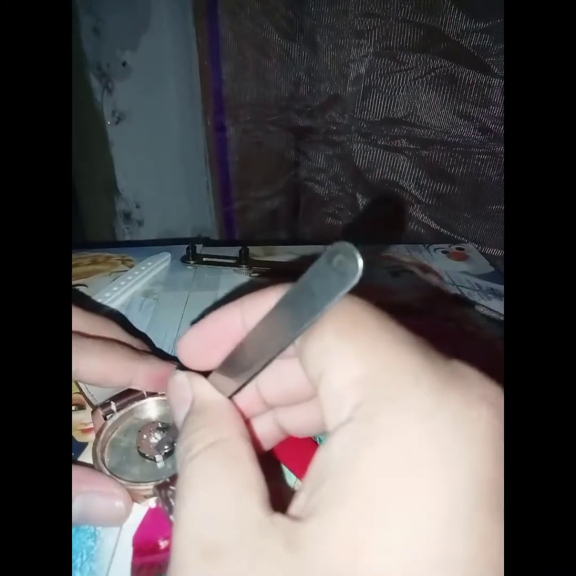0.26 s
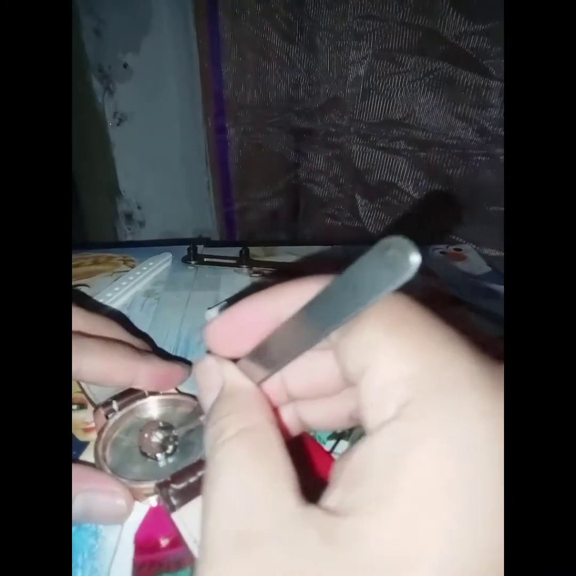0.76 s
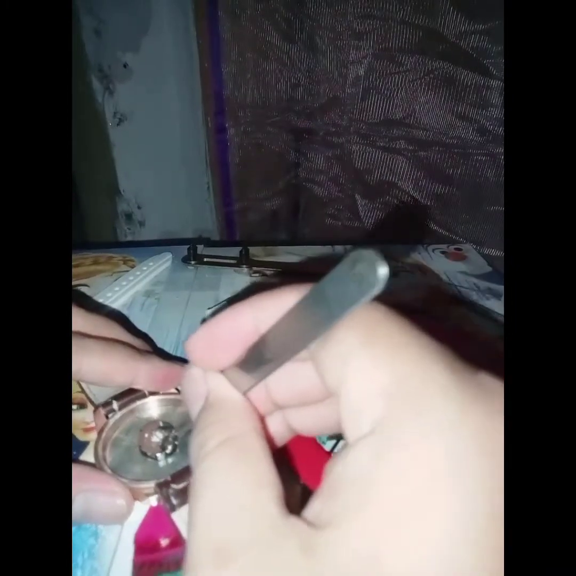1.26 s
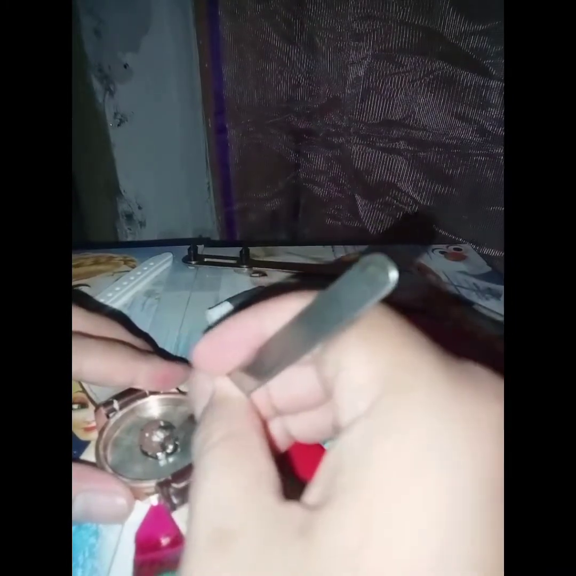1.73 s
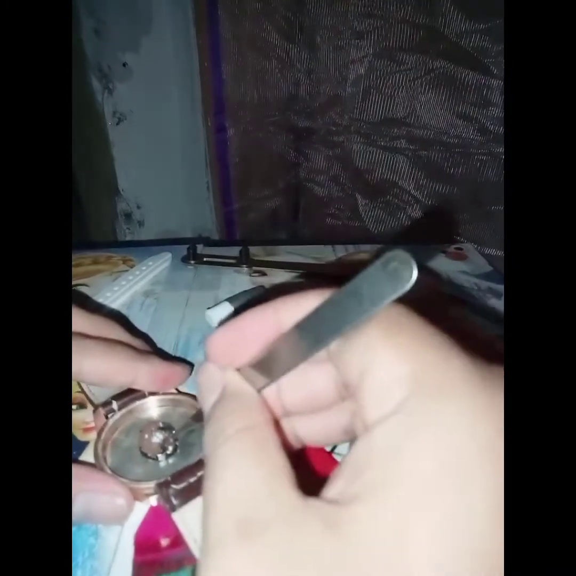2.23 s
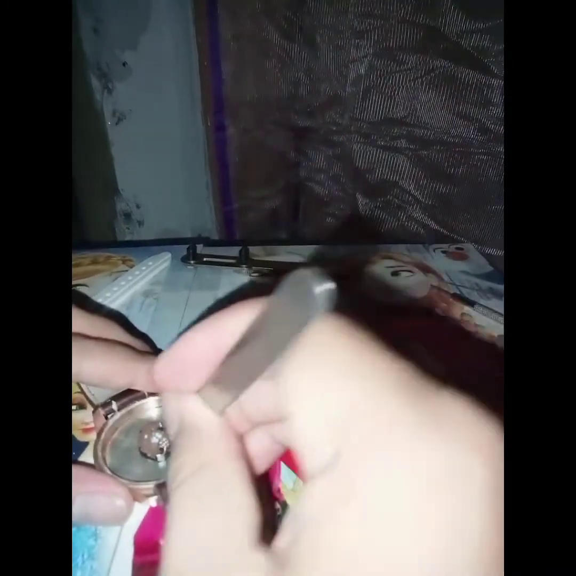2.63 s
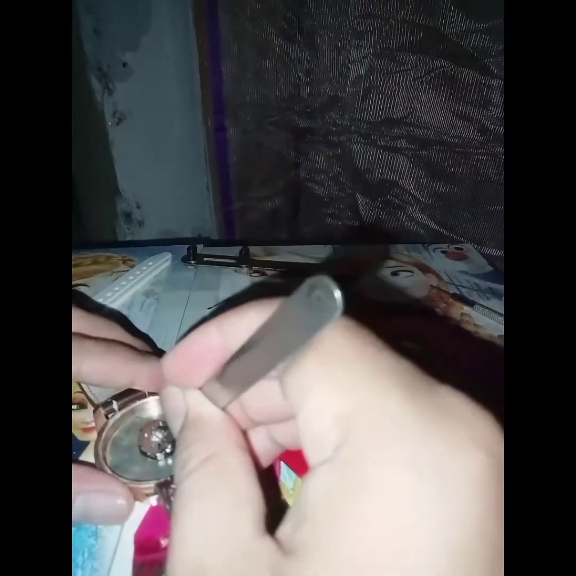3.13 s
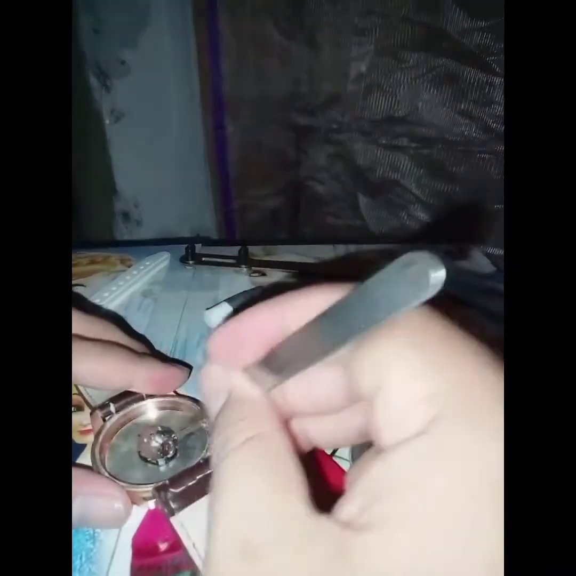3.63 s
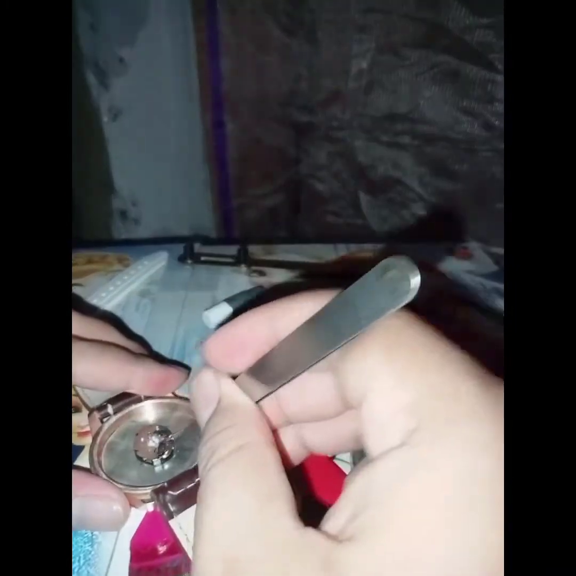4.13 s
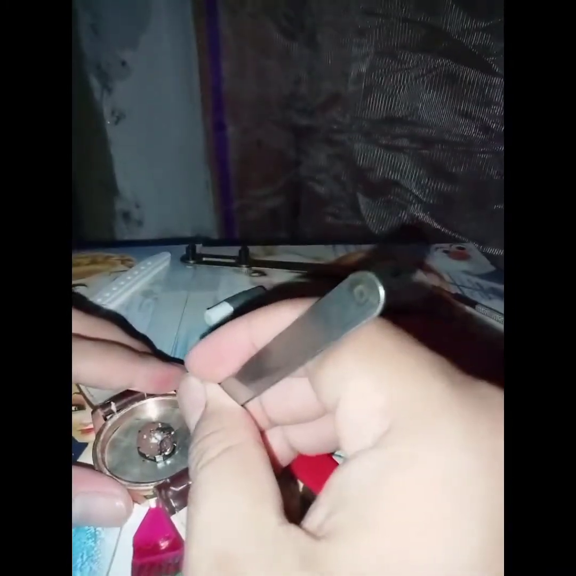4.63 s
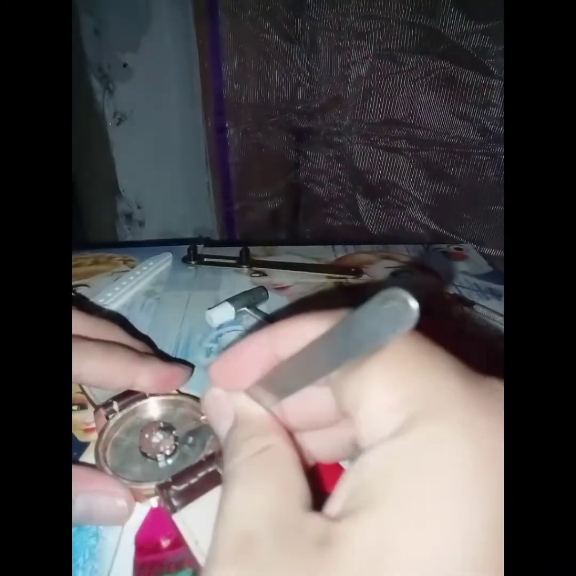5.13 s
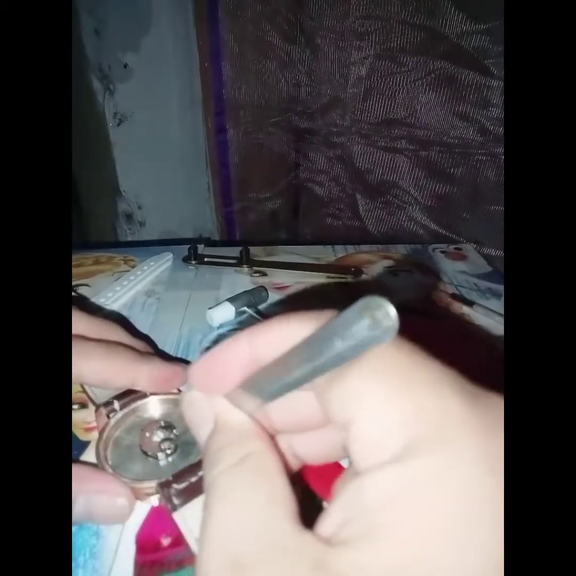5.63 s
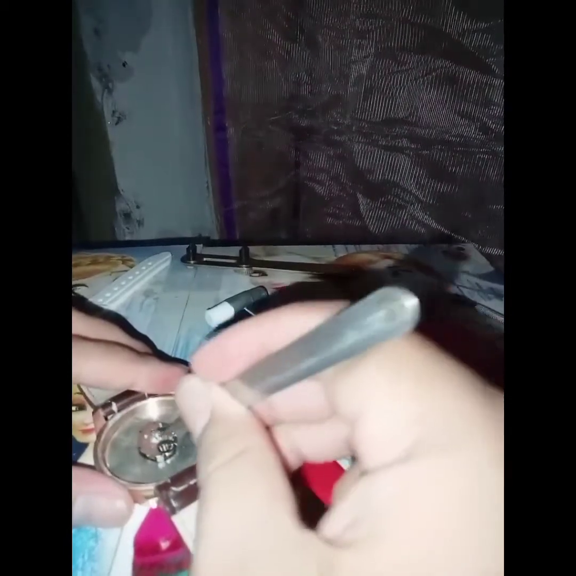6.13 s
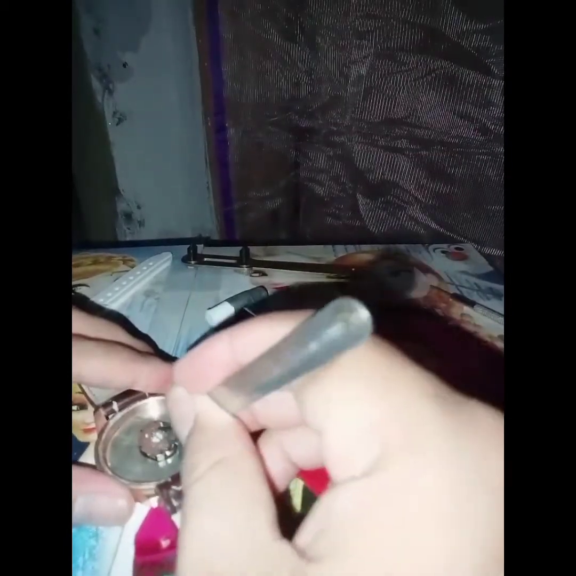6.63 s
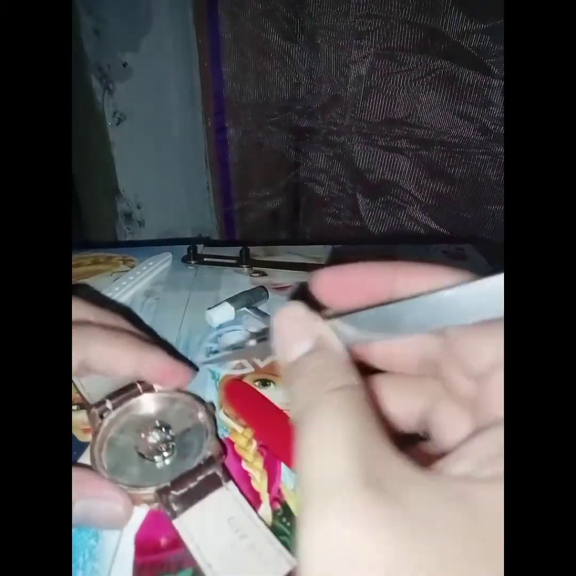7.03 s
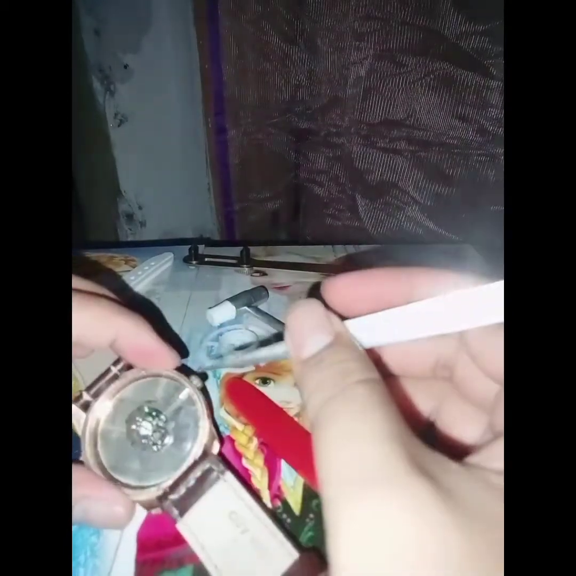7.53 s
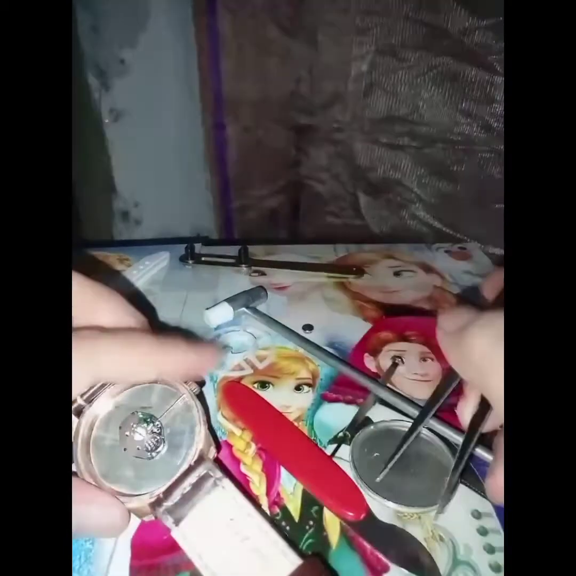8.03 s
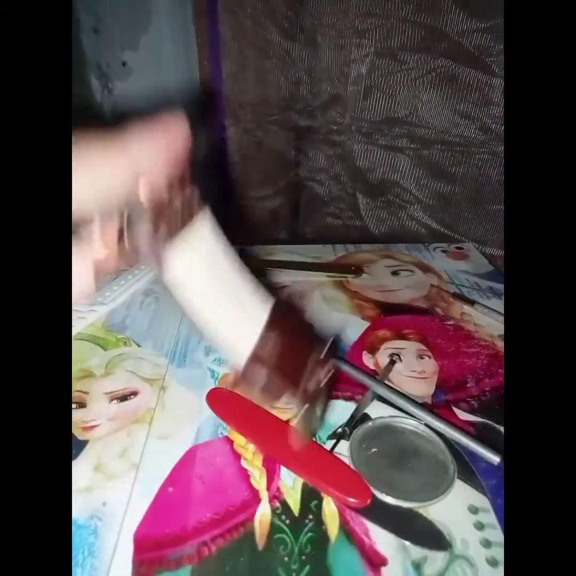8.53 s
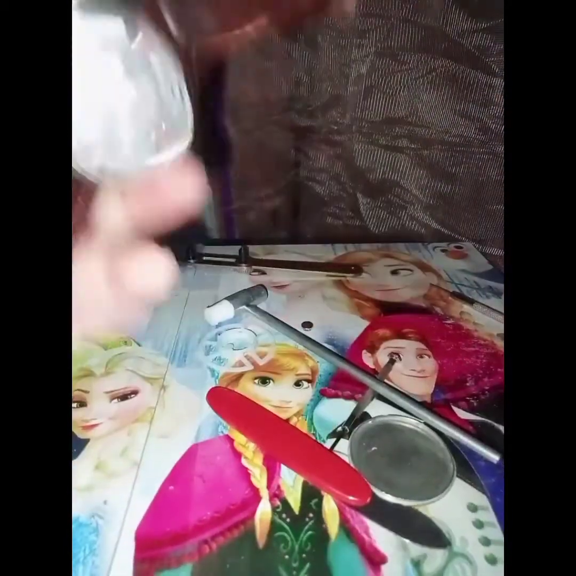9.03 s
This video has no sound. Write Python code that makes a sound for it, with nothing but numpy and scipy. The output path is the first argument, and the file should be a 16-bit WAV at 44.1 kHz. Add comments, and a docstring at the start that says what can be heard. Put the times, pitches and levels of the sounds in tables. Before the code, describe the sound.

Steel tweezers tick and slip lightly on a small battery inside an open wristwatch, in scattered little clusters. About halfway through, the battery snaps into place with a loud, sharp double click. A few faint ticks follow, then the watch squeaks very faintly under the fingers and is dragged off the table with a short rasp, buckle clinks and soft strap knocks. The microphone is close, in a small quiet room.

```python
"""Tweezers seating a watch battery

Steel tweezers tick and slip on a button cell in an open wristwatch on a table, close by in a small room;
each contact excites damped modes. The cell snaps home with a loud double click that drives the limiter.
The watch then squeaks faintly under the fingers and is dragged off the table with stick-slip friction,
its buckle jingling and its strap knocking on the top."""
import sys
import numpy as np
from scipy import signal
from scipy.fft import rfft, irfft, next_fast_len
from scipy.io import wavfile
from scipy.ndimage import uniform_filter1d, minimum_filter1d

SR = 44100
rng = np.random.default_rng(int(sys.argv[2]) if len(sys.argv) > 2 else 0)


def master(y):
    """Save y as 16-bit WAV."""
    cut = np.clip(np.atleast_2d(y).T, -1, 1)
    pcm = np.round(cut * 32767)  # scale
    wavfile.write(sys.argv[1], SR, pcm.astype(np.int16))


N = 408347


def from_db(db):
    """Amplitude ratio of a level in decibels."""
    return 10 ** (np.asarray(db) / 20)


def to_db(gain):
    """Level in decibels of an amplitude ratio."""
    return 20 * np.log10(gain + 1e-7)


def unit_rms(x):
    """Normalisation to unit mean power."""
    return x / np.sqrt(np.mean(x ** 2) + 1e-20)


def at_hz(rows, hz, column=1):
    """Interpolation of a table on a logarithmic frequency axis."""
    rows = np.array(rows)
    return np.interp(np.log(hz + 1), np.log(rows[:, 0]), rows[:, column])


def coloured(x, spectrum):
    """Spectral shaping: multiplication in the frequency domain, returned at unit rms."""
    size = next_fast_len(N)
    gain = from_db(at_hz(spectrum, np.fft.rfftfreq(size, 1 / SR)))
    return unit_rms(irfft(rfft(x, size) * gain, size)[:N])


def resonate(x, hz, width_hz):
    """Damped oscillator: a two-pole resonance whose bandwidth sets its decay rate."""
    r = np.exp(-np.pi * width_hz / SR)
    return signal.lfilter([1, 0, -1], [1, -2 * r * np.cos(2 * np.pi * hz / SR), r * r], x)


# room air, lower once the cell has snapped home: t/s, relative level/dB
AIR_BEFORE_SNAP = [(0.0, -59), (4.05, -53), (4.35, -56), (5.1, -57)]
AIR_AFTER_SNAP = [(5.5, -61), (5.8, -59), (7.53, -60), (8.35, -56)]
# spectrum of the dull background noise: f/Hz, relative density/dB
AIR_SPECTRUM = [(55, -12.5), (90, 0), (170, -5.5), (295, 2), (400, -9.5), (560, -14.5), (850, -6),
                (1400, -13), (1850, -17.5), (2600, -18), (4500, -23), (5600, -33.5), (10000, -39)]
# microphone hiss: f/Hz, bandwidth/Hz, level/dB at the median air level
HISS_BANDS = [(7130, 470, -74), (7800, 310, -82)]
def background(air_db=.5, hiss_follow=0.73):
    """Filtered noise: dull room air and narrow-band microphone hiss swell and sink together."""
    level_db = np.interp(np.arange(N) / SR, *np.transpose(AIR_BEFORE_SNAP + AIR_AFTER_SNAP))
    air = from_db(level_db + air_db) * coloured(rng.standard_normal(N), AIR_SPECTRUM)
    hiss = 0
    for hz, width, db in HISS_BANDS:
        band = resonate(rng.standard_normal(N), hz, width)
        hiss += from_db(db) * unit_rms(resonate(band, hz, 2 * width))
    return air + hiss * from_db(hiss_follow * (level_db - np.median(level_db)))


def slip_force(t, slip_ms, grit=.45, catches=4):
    """Stick-slip: a tip catches a few times and skids over fine grit in between."""
    slip_s = slip_ms * 1e-3
    force = grit * rng.standard_normal(len(t)) / (1 + (t / slip_s) ** 3)
    caught_at = ((np.arange(catches) + rng.random(catches)) / catches * slip_s * SR).astype(int)
    force[caught_at] += rng.choice([-1, 1], catches) * (1 + rng.random(catches))
    pressure = 1 - np.exp(-t / (.25 * slip_s))
    return force * pressure


# modes of case, table, movement, tweezers and small parts: f/Hz, bandwidth/Hz, relative level/dB
PART_MODES = { "case": [(2744, 160, 0.5), (3393, 170, 2), (3750, 540, 0), (4630, 190, -3.5)],
              "table": [(260, 150, -6), (403, 100, -1)], "movement": [(850, 120, -3), (1100, 190, 0),
              (1361, 270, -1.5), (1780, 190, -5.5)], "tweezers": [(6470, 340, 0.5), (7550, 140, 0),
              (7800, 230, -3.5), (9000, 490, -10.5)], "small parts": [(10700, 1200, -6), (13000, 300, -8.5),
              (14100, 940, -0.5), (15400, 190, 2)], }
def ring_parts(force, shares_db, crack_db, widen, detune, scatter_db):
    """Modal superposition: one force rings every part, and the changing grip detunes the modes."""
    sound = from_db(crack_db) * unit_rms(force)
    for modes, share_db in zip(PART_MODES.values(), shares_db):
        part = 0
        for k, (hz, width, db) in enumerate(modes):
            ring = resonate(force, hz * (1 + detune * rng.uniform(-1, 1)), width * widen)
            part += (-1) ** k * from_db(db + scatter_db * rng.standard_normal()) * unit_rms(ring)
        sound += from_db(share_db) * unit_rms(part)
    return sound


def impact(t, level_db, slip_ms, weight_db, hardness_db, spot_hz):
    """Impact radiation: the direct click, and the smoother sum of all directions that feeds the room."""
    movement_db = 1.5 + .24 * weight_db
    tweezers_db = -.5 + .35 * hardness_db
    shares_db = [0, weight_db, movement_db, tweezers_db, hardness_db]   # relative to the case
    force = slip_force(t, slip_ms)
    click = ring_parts(force, shares_db, crack_db=-10.5, widen=0.73, detune=.03, scatter_db=1.0)
    struck_spot = unit_rms(resonate(force, spot_hz, width_hz=260))
    click += from_db(-6) * np.std(click) * struck_spot
    impulse = 1.0 * (t == 0)
    spread = ring_parts(impulse, shares_db, crack_db=-5.0, widen=1.15, detune=.019, scatter_db=2.0)
    dryness = from_db(0.6 * min(level_db + 46, 0))   # light ticks sound drier, with less room tail
    gain = from_db(level_db - 2.5) * np.sqrt(.01 / t[-1])   # energy referred to 10 ms
    return gain * click, gain * dryness * spread


# metal contacts; weight rings the table and movement, hardness the small parts and tweezers:
# t/s, relative case level/dB, slip time/ms, weight/dB, hardness/dB, f/Hz of the struck spot
TOUCHES = [(0.4966, -41, 6.2, -12, -3, 3200), (0.5089, -35.5, 6, -22, -11, 6800),
           (0.529, -43.5, 3.5, -7, -7, 3400), (0.5617, -48.5, 1.54, -5, -3, 6460),
           (1.1244, -51.5, 3.3, -5.5, -5, 830), (1.5357, -48.5, 2.2, -7, -7, 3620),
           (1.852, -28, 3.2, -2, -12, 2840), (2.6403, -30, 7.2, -1, -11, 7500),
           (2.661, -38.5, 1.9, 4, -11, 3410), (2.685, -33, 5.6, -8, -6, 15300),
           (2.733, -42.5, 2.9, -3, -1, 6600), (2.816, -42, 4.3, -7, -3, 6170),
           (3.154, -48.5, 6.1, -4, -13, 6600), (3.343, -34.5, 4.7, -2, -9, 1070),
           (3.349, -29.5, 3.55, -3, -10, 4430), (3.568, -42, 4.6, -9, -7, 3450),
           (3.931, -45.5, 2.8, -26, -4, 3360), (3.951, -46.5, 8.3, -17, -21, 3360),
           (5.151, -8.5, 4.3, 1.5, -4, 4560), (5.185, -3, 4.3, 0, 1, 3700),
           (5.7492, -40, 2.45, -4, -12, 2710), (5.7795, -47, 2.9, -28, -18, 2690),
           (6.348, -47, 1.23, -5, -3, 7350), (6.623, -54, 5.5, -8, -2, 1100),
           (6.7479, -50.5, 1.2, 0, 3, 7400), (6.9817, -50, 5.1, -4, -14, 2800),
           (8.2487, -46.5, 3.5, -7, -25, 1420), (8.4327, -43.5, 2.8, -26, 10, 13770),
           (8.448, -40, 3.9, 2, 6, 7160), (8.4911, -32.5, 2.5, 1, 11, 15500),
           (8.639, -48, 2.8, -12, 0.5, 6700), (8.827, -46.5, 8.1, -13, -25, 2280)]
# light, hard grazes of the tips: t/s, nominal peak level/dB
GRAZES = [(1.1513, -39), (2.0238, -47), (2.8594, -46), (4.0183, -40), (4.0534, -38), (4.1849, -43.5),
          (4.5082, -43.5), (4.9025, -49.5), (7.8331, -45)]
# heavy, soft bumps of the watch on the table: t/s, relative case level/dB
BUMPS = [(2.692, -44.5), (8.497, -39), (8.537, -48)]
def contacts(graze_crest_db=18):
    """Linear superposition: all impacts add into a direct sound and a feed to the room."""
    # both are filled out to the columns of TOUCHES
    grazes = [(s, db - graze_crest_db, 4, -12, -3, 7200) for s, db in GRAZES]
    bumps = [(s, db, 2.6, 11, -11, 890) for s, db in BUMPS]
    t = np.arange(int(.05 * SR)) / SR
    direct, room_feed = np.zeros((2, N + len(t)))
    for start, *blow in TOUCHES + bumps + grazes:
        click, spread = impact(t, *blow)
        span = slice(int(start * SR), int(start * SR) + len(t))
        direct[span] += click
        room_feed[span] += spread
    return direct[:N], room_feed[:N]


# diffuse tail: f/Hz, reverberation time T60/s, level/dB relative to the feed
ROOM_DECAY = [(107, 0.45, 4), (370, 0.33, -1.5), (1100, 0.3, -2.7), (3000, 0.33, -9.3), (7350, 0.31, -10.5),
              (15000, 0.26, -13)]
def room(x, build_s=0.0087, echo_s=0.021, echo_db=-18.5, echo_hz=7150, echo_width_hz=900):
    """Reverberation: a diffuse field decays band by band; a near surface adds one bright reflection."""
    t = np.arange(int(.8 * SR)) / SR
    edges_hz = np.geomspace(70, 17000, 17)
    response = np.zeros(len(t))
    for low, high in zip(edges_hz, edges_hz[1:]):
        hz = np.sqrt(low * high)
        bandpass = signal.butter(2, [low, high], "band", fs=SR, output="sos")
        band = signal.sosfilt(bandpass, rng.standard_normal(len(t)))
        envelope = np.exp(-np.log(1000) * t / at_hz(ROOM_DECAY, hz)) * (1 - np.exp(-(t / build_s) ** 2))
        gain = from_db(at_hz(ROOM_DECAY, hz, column=2)) * np.sqrt(2 * (high - low) / SR / len(t))
        response += gain * unit_rms(band * envelope)
    delayed_impulse = np.arange(len(t)) == int(echo_s * SR)
    echo = resonate(delayed_impulse, echo_hz, echo_width_hz) * np.pi * echo_width_hz / SR
    return signal.fftconvolve(x, response + from_db(echo_db) * echo)[:N]


def arch(start, length):
    """Half-sine envelope: it rises from 0 to 1 and returns."""
    return np.sin(np.pi * np.clip((np.arange(N) / SR - start) / length, 0, 1))


# fingers shifting on case and strap, and brief swells of the dull background noise:
# t/s, duration/s, friction level/dB, swell level/dB
STROKES = [(3.378, 0.37, -67, -57), (3.72, 0.59, -74, -53.5), (6.95, .35, -76, -64), (7.22, .08, -63, -70),
           (7.74, .16, -67, -64), (8.055, .42, -75, -61.5), (8.546, .42, -62, -48.5),
           (8.687, .15, -52.5, -60), (8.896, .35, -72, -54)]
def stroke_gains(resting_grip_db=-92):
    """Amplitude envelopes: finger friction grows as speed squared; the background swells briefly."""
    friction, swell = from_db(resting_grip_db), 0
    for start, length, friction_db, swell_db in STROKES:
        envelope = arch(start, length)
        friction += from_db(friction_db) * envelope ** 2
        swell += from_db(swell_db) * envelope
    return friction, swell


def sliding(level_db, spectrum, catches_per_s, grain_db, smooth, thinning):
    """Friction as shot noise: surfaces catch densely under pressure, sparsely under a light touch."""
    density = from_db(thinning * (level_db - level_db.max()))
    sizes = from_db(grain_db * np.minimum(rng.exponential(1, N), 3)) * rng.choice([-1, 1], N)
    caught = rng.random(N) < catches_per_s * density / SR
    grains = sizes * caught / np.sqrt(density)
    return from_db(level_db) * coloured(grains + smooth * rng.standard_normal(N), spectrum)


# friction on the watch: f/Hz, relative density/dB
RUB_SPECTRUM = [(150, -7.5), (900, 2), (1500, -4), (3600, 2.5), (5400, -11.5), (6600, 3.5), (7200, 10),
                (8300, 3.5), (11500, -4.5), (15200, 1)]
def watch_rub(gain):
    """Fine-grained friction: the watch slides against fingers or table with a bright rasp."""
    return sliding(to_db(gain), RUB_SPECTRUM, catches_per_s=5000, grain_db=2.0, smooth=.3, thinning=.7)


def wander(samples):
    """Low-pass noise: a random drift of unit rms, from two moving averages."""
    return unit_rms(uniform_filter1d(uniform_filter1d(rng.standard_normal(N), samples), samples))


# squeaks of the handled watch: t/s, duration/s, f/Hz at full speed, level/dB
SQUEAKS = [(7.92, 0.18, 6750, -75), (8.07, .3, 7630, -68)]
# their partials: frequency ratio, relative level/dB
SQUEAK_PARTIALS = [(.76, -11), (1, -0.5), (1.24, -12), (1.43, -14), (1.7, -8)]
def squeaks(sag_at_rest=.13, waver=.009, flicker_db=4.5):
    """Friction-induced vibration: thin, broken partials follow the sliding speed in pitch and level."""
    sound = 0
    for start, length, top_hz, db in SQUEAKS:
        speed = arch(start, length)
        hz = top_hz * (1 - sag_at_rest * (1 - speed) + waver * wander(samples=24))
        phase = 2 * np.pi * np.cumsum(hz) / SR
        for ratio, partial_db in SQUEAK_PARTIALS:
            gain = speed * from_db(db + partial_db + flicker_db * wander(samples=700))
            sound += gain * np.sin(ratio * phase)
    return sound


def pull_gains(start_s=8.432, attack_s=.005, hold_s=.13, release_s=.02,
               scrape_db=-33, fall_db_per_s=110, drag_db=-43.5, flap_db=-29.5, flap_s=.018):
    """Friction falls with load: the lifting case scrapes less; the strap trails and flaps at each bump."""
    t = np.arange(N) / SR
    elapsed = np.maximum(t - start_s, 0)
    touching = np.minimum(elapsed / attack_s, 1) * np.exp(-np.maximum(elapsed - hold_s, 0) / release_s)
    scrape = from_db(scrape_db - fall_db_per_s * elapsed)
    flaps = sum(np.exp(-((t - s - flap_s / 2) / flap_s) ** 2) for s, _ in BUMPS)
    trailing = from_db(drag_db) + from_db(flap_db) * flaps
    return touching * scrape, touching * trailing


# table top under the strap: f/Hz, relative density/dB
TABLE_SPECTRUM = [(50, -27), (170, -9), (410, 1), (620, -11.5), (870, 0.5), (1250, -18.5), (1600, -9),
                  (9000, -42.5)]
def strap_drag(gain):
    """Forced vibration: coarse catches of the trailing strap drive the table top."""
    return sliding(to_db(gain), TABLE_SPECTRUM, catches_per_s=1400, grain_db=1.0, smooth=.11, thinning=.18)


def scene():
    """Superposition at the microphone: direct sound, reverberation and background."""
    clicks, room_feed = contacts()
    friction, swell = stroke_gains()
    scrape, trailing = pull_gains()
    rubbing = watch_rub(friction + scrape) + strap_drag(trailing)
    background_swells = swell * coloured(rng.standard_normal(N), AIR_SPECTRUM)
    direct = clicks + rubbing + squeaks()
    reverberation = room(room_feed + .5 * rubbing)
    return (direct + reverberation + background() + background_swells)[None]


def limiter(x, release_db_per_s=88):
    """Peak limiting: the gain drops at once above full scale and creeps back, holding up the tail."""
    over_db = np.maximum(to_db(np.abs(x)), 0)
    ramp_db = release_db_per_s * np.arange(N) / SR
    cut_db = np.maximum.accumulate(over_db + ramp_db) - ramp_db
    gain_db = uniform_filter1d(minimum_filter1d(-cut_db, size=45), size=45)   # smoothed over 1 ms
    return x * from_db(gain_db)


def record(dry, ceiling=0.97, low_cut_hz=70, high_cut_hz=15600):
    """Saturation and band limiting: limited peaks are rounded, the bass thinned, the top cut steeply."""
    rounded = ceiling * np.tanh(limiter(dry[0]) / ceiling)
    highpass = signal.butter(2, low_cut_hz, "high", fs=SR, output="sos")
    lowpass = signal.ellip(10, .3, 70, high_cut_hz, fs=SR, output="sos")
    return signal.sosfilt(lowpass, signal.sosfilt(highpass, rounded))[None]


dry = scene()
out = record(dry)
master(out)
```